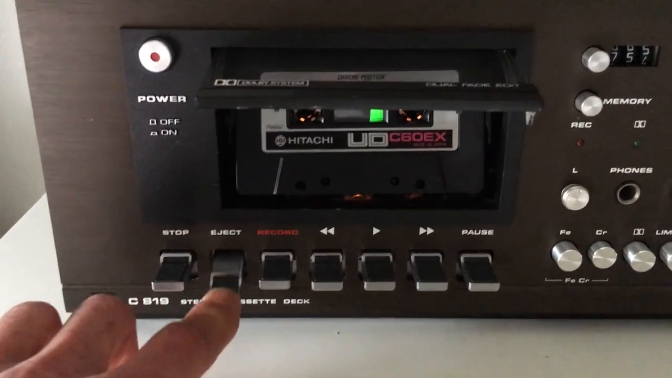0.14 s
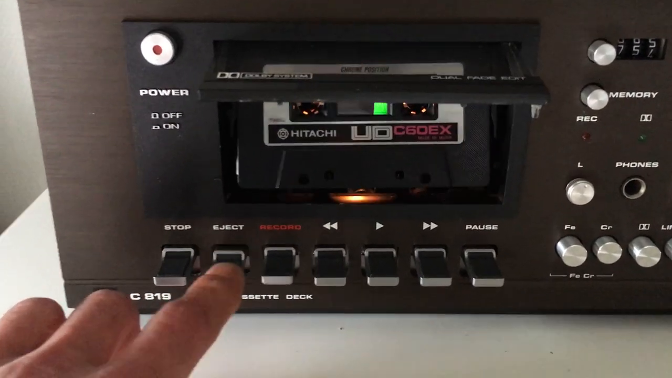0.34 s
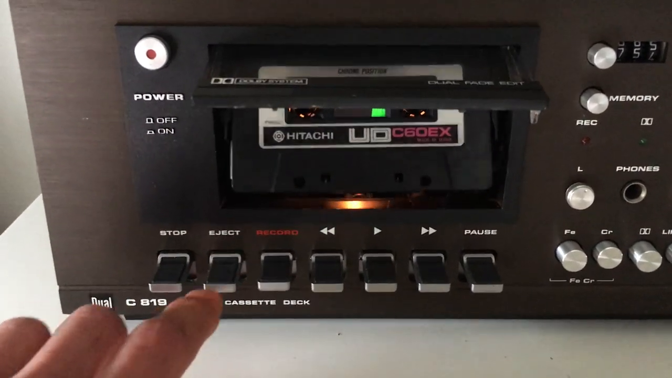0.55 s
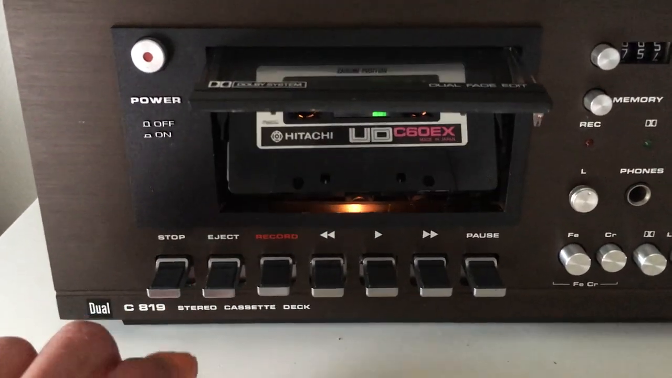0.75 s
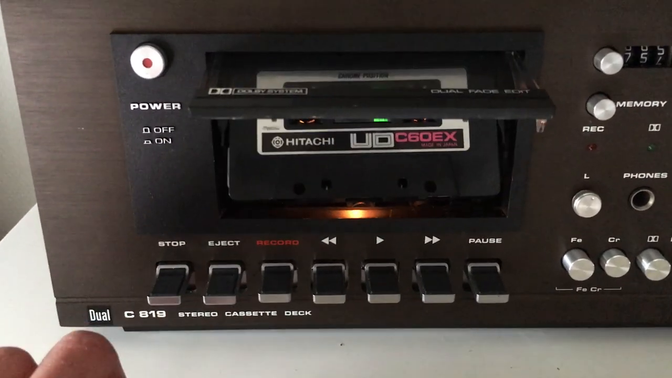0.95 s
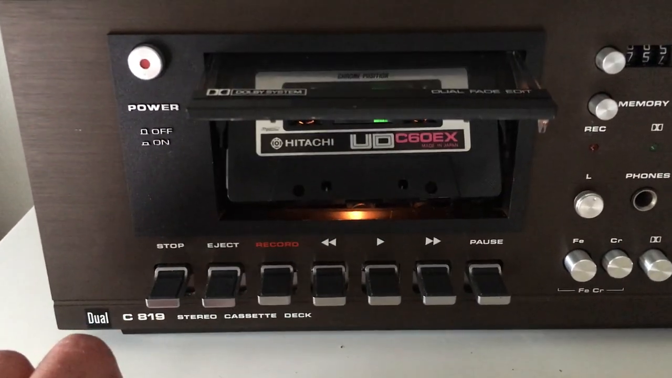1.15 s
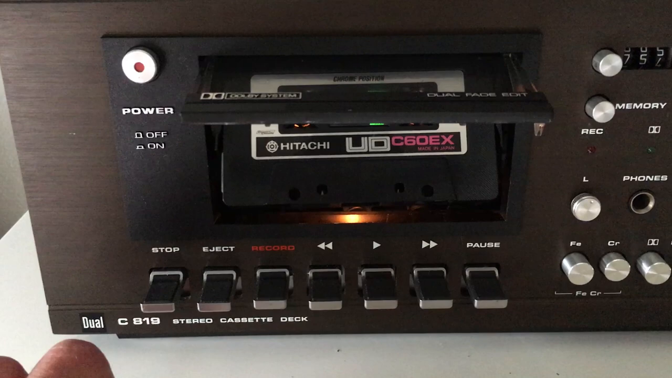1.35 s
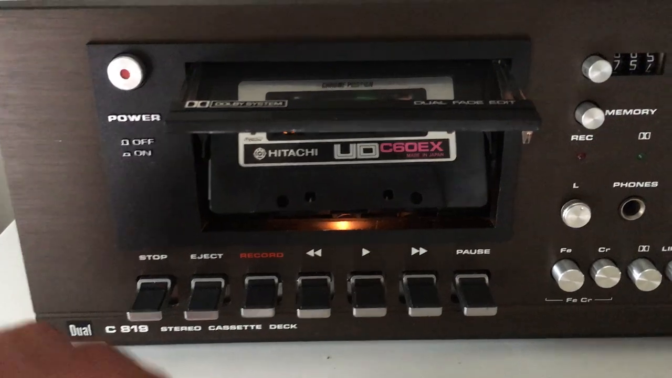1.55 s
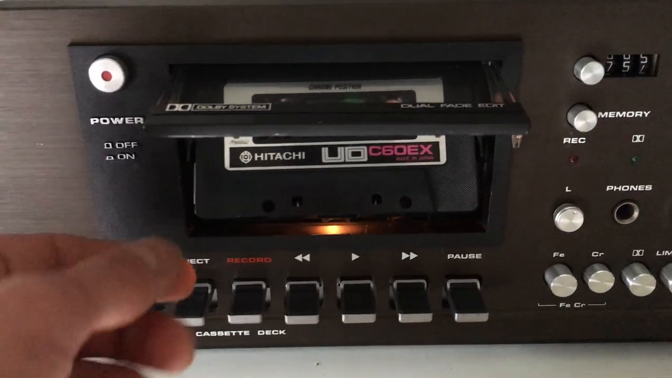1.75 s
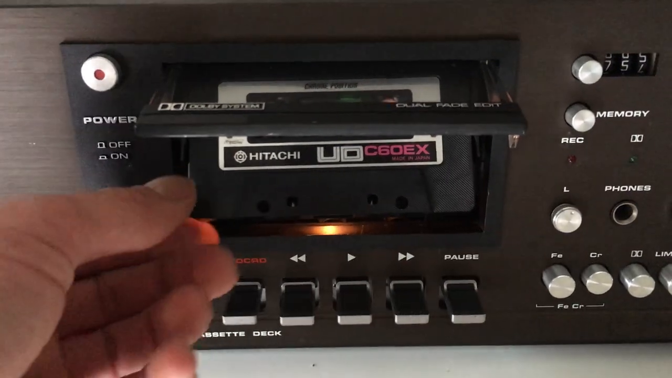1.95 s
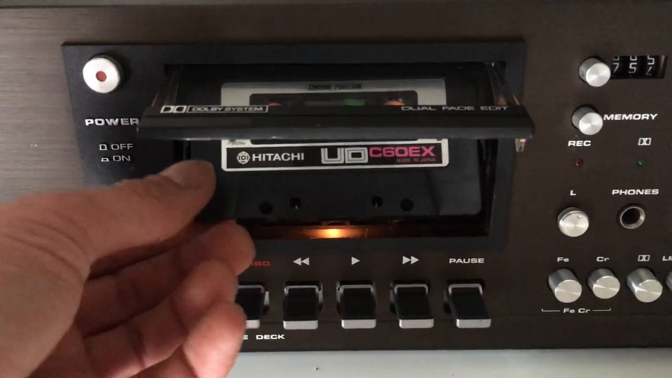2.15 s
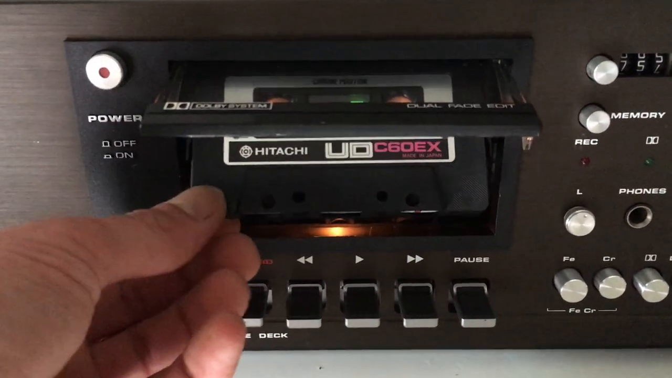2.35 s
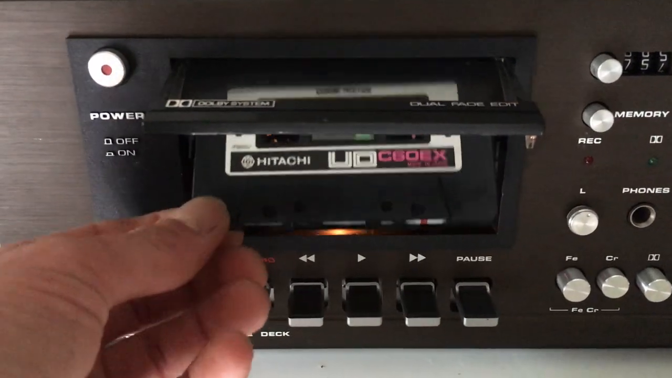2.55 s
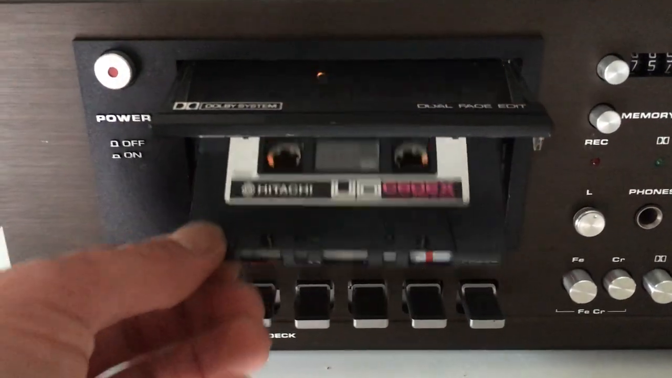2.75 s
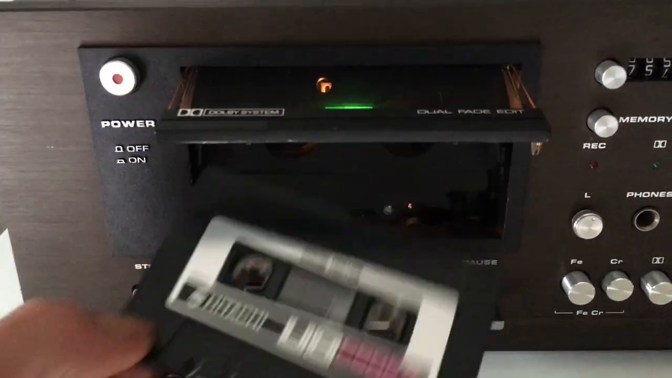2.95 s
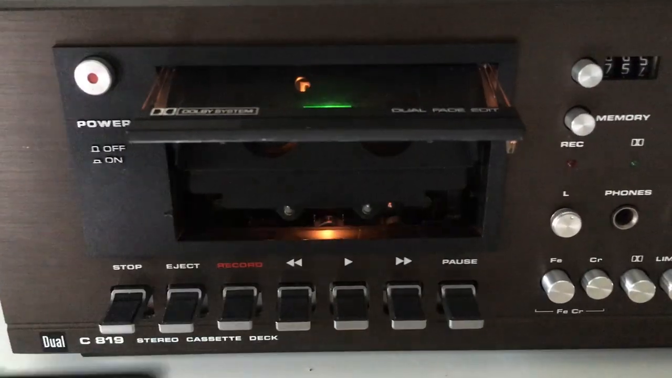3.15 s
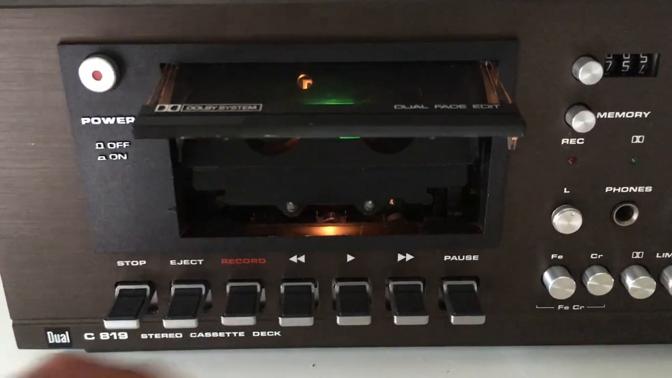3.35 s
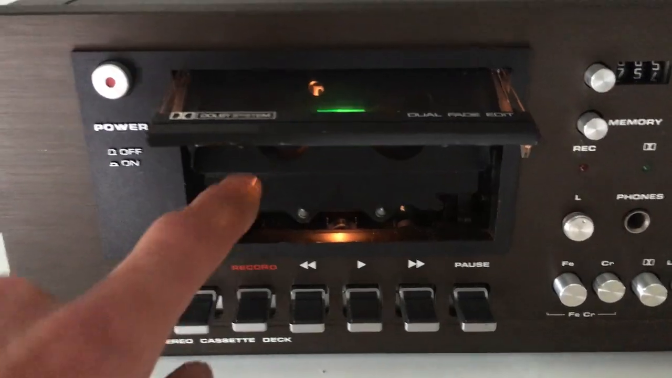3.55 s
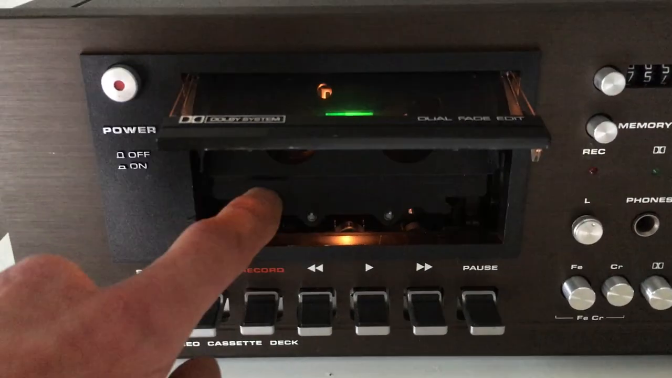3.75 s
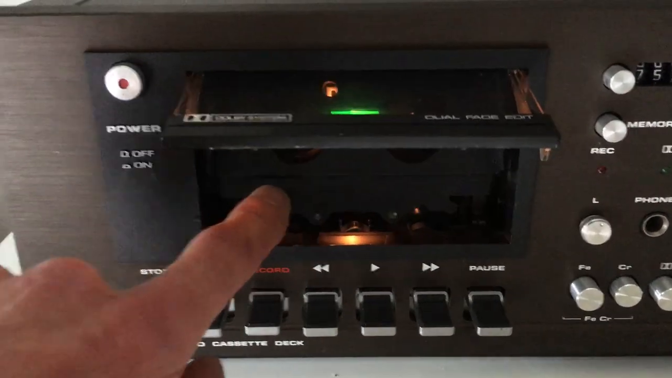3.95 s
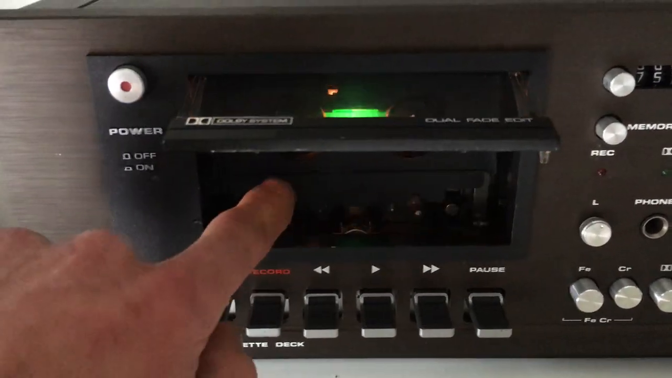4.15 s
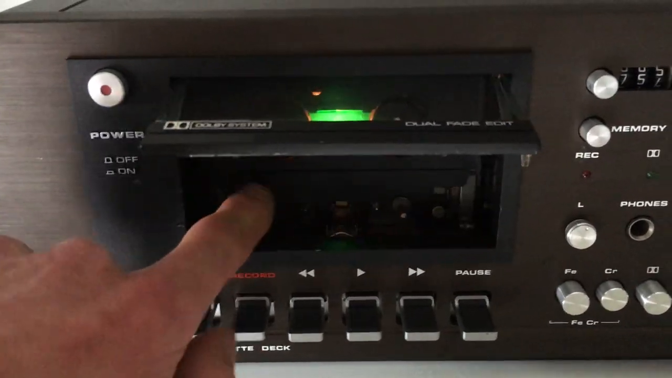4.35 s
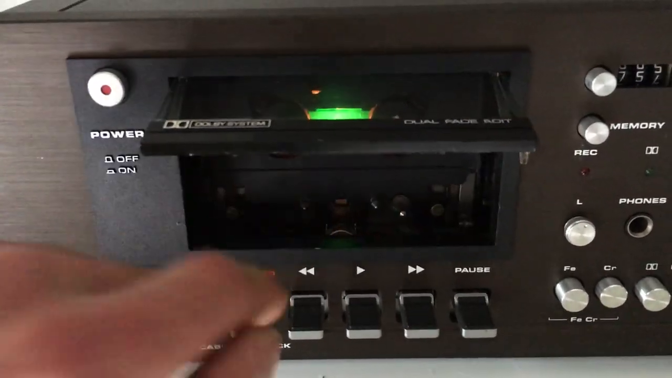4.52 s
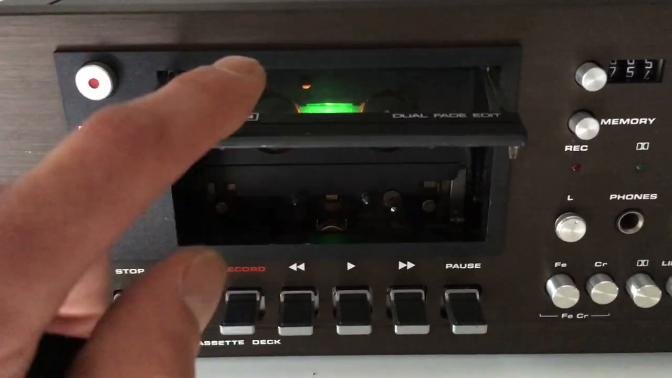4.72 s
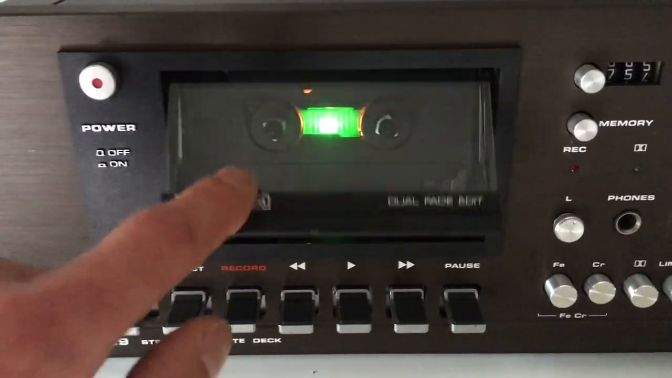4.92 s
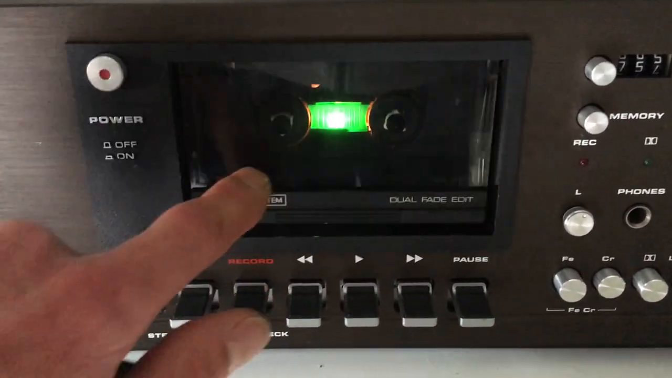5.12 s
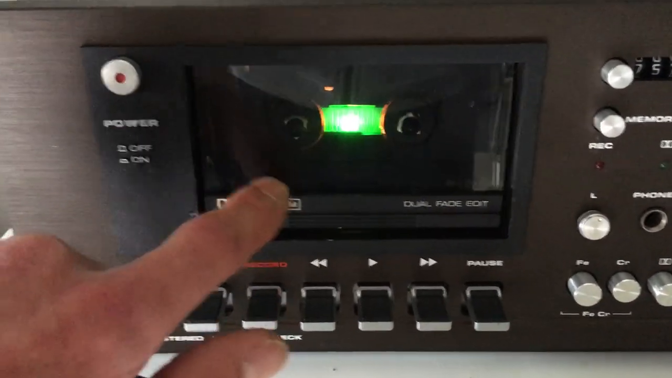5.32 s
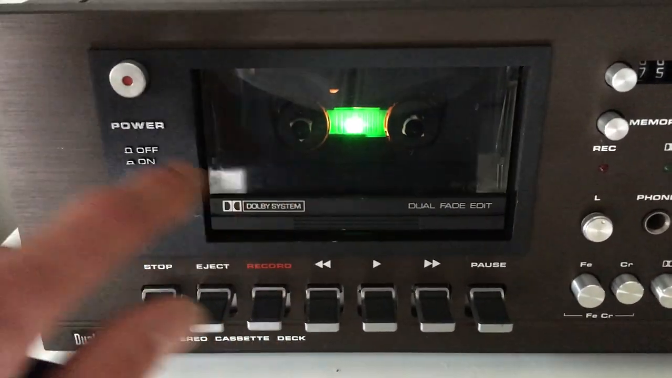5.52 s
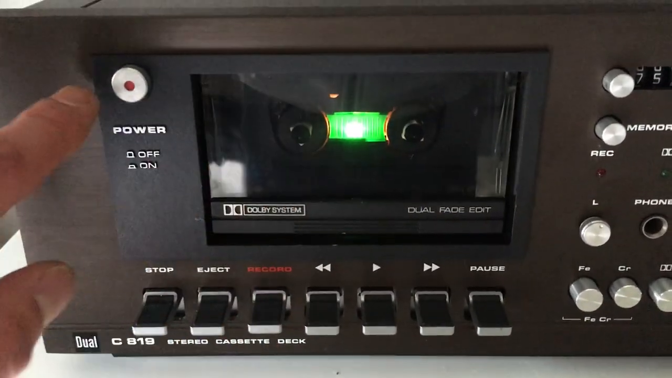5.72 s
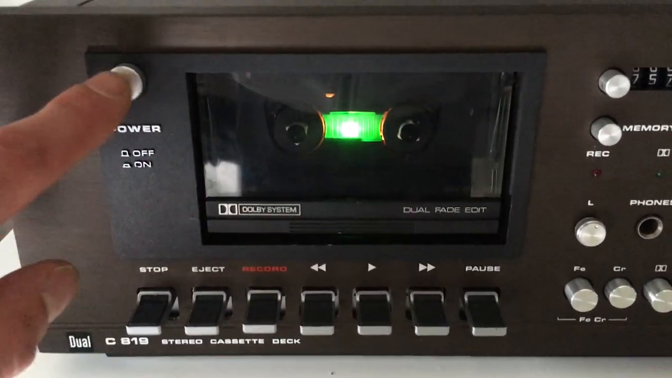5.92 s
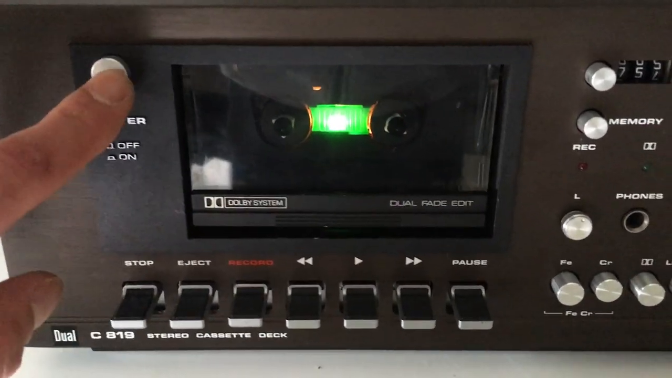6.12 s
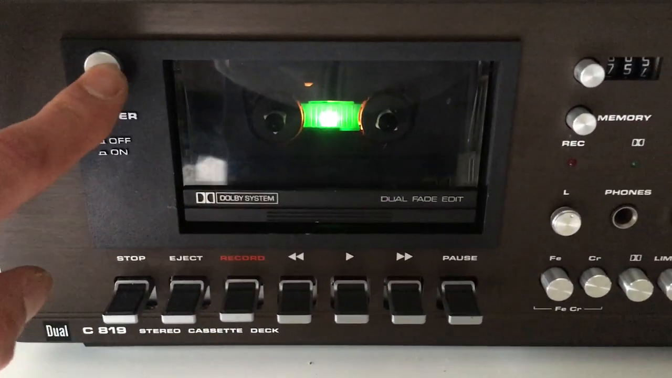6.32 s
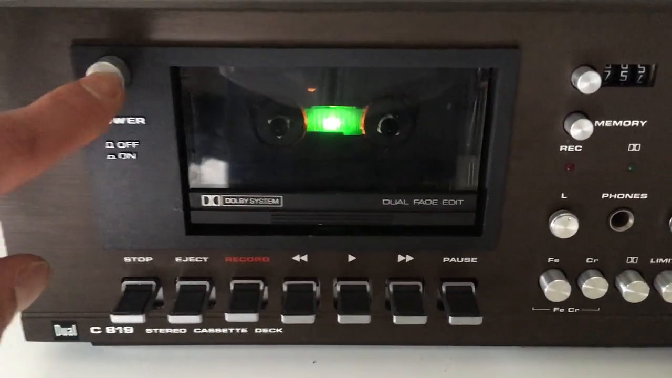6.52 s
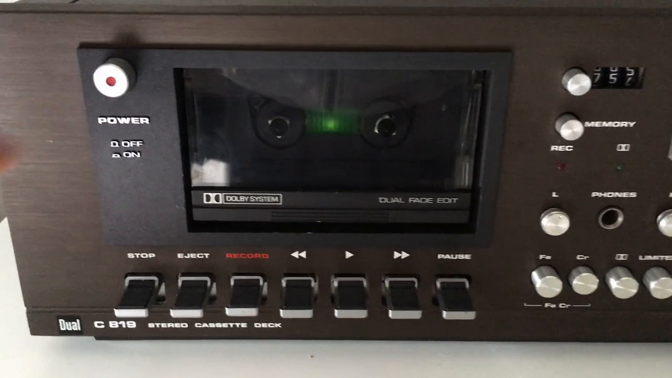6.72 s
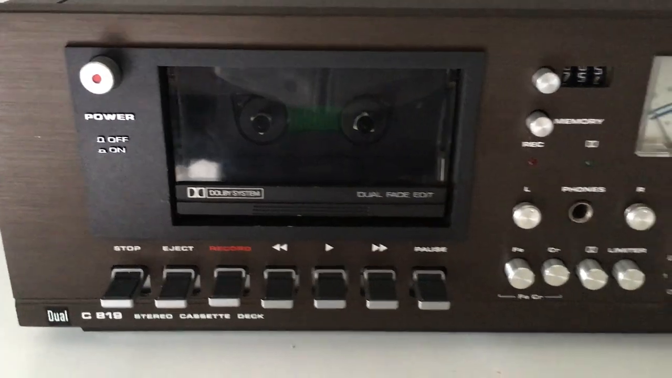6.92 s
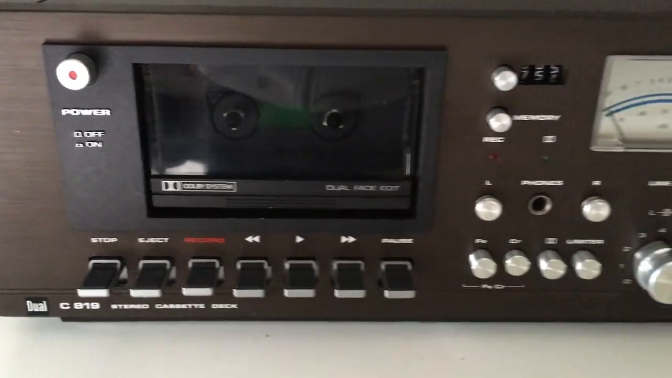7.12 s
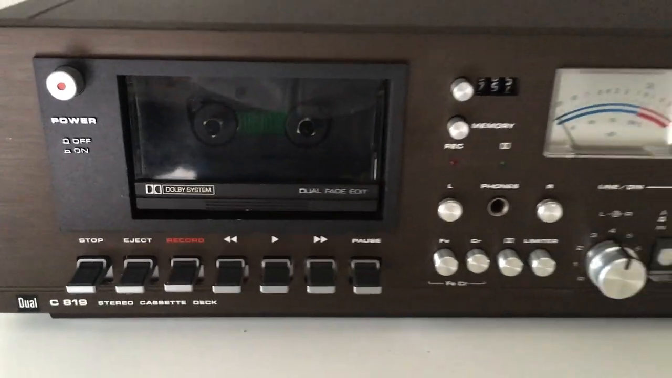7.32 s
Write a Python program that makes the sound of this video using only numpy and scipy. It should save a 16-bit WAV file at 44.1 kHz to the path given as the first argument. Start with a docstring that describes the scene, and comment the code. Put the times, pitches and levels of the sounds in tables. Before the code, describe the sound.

A cassette player's key snaps, a plastic tape rattles out, then the mechanism, door latch and power button click in a quiet room.

```python
"""A cassette deck worked by hand, close up in a small, quiet room. The eject key snaps back, the door
swings open on its whirring damper, the cassette is wiggled and slid out, a finger trips the sprung
transport, the door is latched shut and the power button is pushed in and released. Each click is a
short crack plus the ring of the struck part, and the firm blows of most parts thump the cabinet.
Sliding plastic rubs in tiny slips; low room air, hiss and a faint hum lie underneath."""
import sys
import numpy as np
from scipy import signal
from scipy.fft import rfft, irfft, next_fast_len
from scipy.io import wavfile
from scipy.ndimage import map_coordinates

SR = 44100
rng = np.random.default_rng(int(sys.argv[2]) if len(sys.argv) > 2 else 0)


def log_audio(samples):
    """Write samples as a 16-bit WAV file to the path given in sys.argv[1]."""
    # one column per channel
    frames = np.atleast_2d(samples).T
    # limit to full scale, then quantise
    limited = np.clip(frames, -1, 1)
    pcm = np.round(limited * 32767).astype(np.int16)
    wavfile.write(sys.argv[1], SR, pcm)


N = 325017
TOP_HZ = 16000
STEEL_RING_WET_DB = -19


def transport():
    """The sprung transport trips: a few light ticks, then a hard, bright volley of hits."""
    # hits: t/s, level/dB, brightness/(dB/octave)
    hits = [(3.7719, -57.5, -7), (4.005, -53, -12.5), (4.2215, -47, 1.5), (4.2405, -25, -3),
            (4.2442, -12, 0), (4.2465, -17.5, 2), (4.2488, -15.5, -1), (4.2512, -11.3, 1.8)]
    # crack colour: f/Hz, level/dB
    colour = [(30, -28), (120, -5.5), (400, -10.5), (650, -9.5), (1200, -16), (2200, -6), (2900, -11),
              (5000, -6), (9000, -2.5), (12000, -2), (16000, -6)]
    # steel modes: f/Hz, level/dB, t60/s
    modes = [(410, -29, .1), (630, -29, .07), (990, -29, .07), (1660, -28, .06), (2030, -25, .07),
             (2453, -20, .06), (3995, -16, .05), (5650, -21, .04), (6325, -20, .05), (11160, -17, .035),
             (11826, -9, .028), (14460, -13, .028)]
    snap = clicks(hits, colour, modes, crack_db=4.5, ring_db=2.5, damping=1.77, ring_growth=.14,
                  wet_db=-9, ring_wet_db=STEEL_RING_WET_DB, rebound_s=.0059, loss_db=14, duller_db=4.5)
    return snap + thumps(hits, share_db=-19, centre_hz=145, lag_s=.0011)


def eject_key():
    """The eject key ticks under the finger and snaps back."""
    # hits: t/s, level/dB, brightness/(dB/octave)
    hits = [(.1626, -55, 14), (.2434, -51.5, -6.5), (.3788, -47, 4), (.399, -47.5, -6), (.4148, -21, 5.5)]
    # crack colour: f/Hz, level/dB
    colour = [(120, -39), (200, -11.5), (1770, -10), (1980, -14), (2290, -2), (2700, -14), (2960, -4.5),
              (4860, -13), (5630, -7), (12400, -9.5), (16000, -12)]
    # steel modes: f/Hz, level/dB, t60/s
    modes = [(1460, -22, 0.046), (1748, -17.5, .04), (2220, -10, 0.022), (2960, -10, 0.032),
             (4340, -16, 0.045), (5670, -13, .03), (6740, -8, .015), (9300, -11, 0.013), (12170, -8, 0.016)]
    snap = clicks(hits, colour, modes, crack_db=2, ring_db=8.5, damping=1.02, ring_growth=.35,
                  wet_db=-10, ring_wet_db=STEEL_RING_WET_DB, rebound_s=.0035, loss_db=7, duller_db=7)
    return snap + thumps(hits, share_db=-21.5, centre_hz=215, lag_s=.004)


def door():
    """The door comes free with a clatter of rebounding hits."""
    # hits: t/s, level/dB, brightness/(dB/octave)
    hits = [(.6195, -37.5, 0), (.6408, -33, 5), (.6478, -24, -1.5), (.6508, -28, -2), (.6568, -19.5, 1),
            (.819, -59, 1)]
    # crack colour: f/Hz, level/dB
    colour = [(120, -48), (200, -29), (448, -15), (635, -9), (1300, -11.5), (1500, -12), (1680, 0),
              (2470, -11), (4680, -11), (5700, -9.5), (10500, -15), (11500, -13.5), (16000, -19)]
    # door modes: f/Hz, level/dB, t60/s
    modes = [(630, -15, 0.077), (1310, -5, 0.033), (1647, -1.5, 0.051), (1810, -14, 0.043),
             (2030, -6.5, 0.068), (3010, -15, 0.043)]
    clatter = clicks(hits, colour, modes, crack_db=.5, ring_db=-7, damping=1.47, ring_growth=.4,
                     wet_db=-14, ring_wet_db=-12.5, rebounds=3, rebound_s=.0113, loss_db=11,
                     duller_db=1.6)
    return clatter + thumps(hits, share_db=-16.5, centre_hz=183, lag_s=.014)


def latch():
    """The door is pushed shut and its latch catches with a clack."""
    # hits: t/s, level/dB, brightness/(dB/octave)
    hits = [(4.8513, -51, -3.5), (4.857, -49.5, 0.7), (5.1238, -34.5, 3), (5.156, -43, 1),
            (5.162, -21.5, 2.5), (5.3538, -55, -2.5)]
    # crack colour: f/Hz, level/dB
    colour = [(150, -35), (250, -10.5), (1280, -10.5), (1450, -4.5), (1670, -5.5), (2050, -8.5),
              (2400, -4.5), (2910, -10), (3710, -11), (10900, -13.5), (16000, -8)]
    # latch modes: f/Hz, level/dB, t60/s
    modes = [(648, -19, 0.2), (1301, -16, 0.12), (1660, -13.5, 0.066), (2230, -25, 0.041), (2354, 0, 0.02),
             (3620, -19.5, 0.037)]
    clack = clicks(hits, colour, modes, crack_db=.5, ring_db=.3, damping=.91, ring_growth=.08,
                   wet_db=-12, ring_wet_db=-20, rebound_s=.0025, loss_db=11, duller_db=4)
    return clack + thumps(hits, share_db=-24.5, centre_hz=132, lag_s=.003)


def power_button():
    """The power button clicks in, slides back out and clicks again."""
    # hits: t/s, level/dB, brightness/(dB/octave)
    hits = [(6.2473, -24, 3), (6.4508, -57, -6.5), (6.5553, -32, -1)]
    # crack colour: f/Hz, level/dB
    colour = [(150, -22), (500, -13), (1000, -11), (1500, -10), (2600, -4), (3600, -10), (4600, -19.5),
              (6200, -1.5), (7800, -9.5), (13500, 3.5), (16000, -6.5)]
    # button modes: f/Hz, level/dB, t60/s
    modes = [(2290, -22, .06), (2573, -16, 0.055), (2650, -25, 0.076), (6030, -18, 0.052),
             (9480, -15, 0.043), (13800, -9, 0.022)]
    # return stroke: t/s, length/s, level/dB
    stroke = [(6.5, 0.056, -55.5)]
    # scrape colour: f/Hz, level/dB
    scrape_colour = [(600, 1), (1600, -2), (4500, -0.5), (8000, -6), (15000, -8)]
    click = clicks(hits, colour, modes, crack_db=0, ring_db=-.3, damping=.57, ring_growth=.82,
                   wet_db=-11, ring_wet_db=-5.5, rebound_s=.0042, loss_db=11, duller_db=4.5)
    return click + rubbing(stroke, scrape_colour, swell=.86, release_s=.045, slips_per_s=1200,
                           smooth=.73, wet_db=-2)


def cassette():
    """The wiggled cassette clacks, and its loose reels knock inside the hollow shell."""
    # shell hits: t/s, level/dB, brightness/(dB/octave)
    hits = [(2.463, -45, -6), (2.472, -34.5, 1.5), (2.4785, -36, 1.5), (2.5485, -30, 3), (2.571, -42, -6),
            (2.687, -42, -4), (3.2953, -48.5, 11), (3.4337, -54, -2), (3.443, -54, 4)]
    # reel knocks: t/s, level/dB, brightness/(dB/octave)
    knocks = [(2.0902, -58, 0.5), (2.2042, -43, -3), (3.18, -61, 2), (3.345, -54.5, -2.5)]
    # crack colour: f/Hz, level/dB
    colour = [(150, -9), (250, -9), (3120, -6.5), (3770, -12), (4410, -4.5), (5070, -7.5), (9010, -3.5),
              (10200, -11), (11700, -3), (16000, -15)]
    # shell modes: f/Hz, level/dB, t60/s
    modes = [(667, -19.5, 0.027), (1440, -11, 0.023), (1926, -10.5, 0.022), (2190, -8, 0.017),
             (2760, -11.5, 0.014)]
    shell = clicks(hits, colour, modes, crack_db=2.5, ring_db=-4, damping=1.03, ring_growth=.11,
                   wet_db=-13.5, ring_wet_db=-11, rebound_s=.0061, loss_db=5.5, duller_db=3)
    reels = clicks(knocks, colour, modes, crack_db=1.5, ring_db=11, damping=1.13, ring_growth=.23,
                   wet_db=-13, ring_wet_db=-12.5, rebounds=0)
    return shell + reels + thumps(hits, share_db=-16.5, centre_hz=145, lag_s=.003)


def panel():
    """Dull knocks on the panel carry strongly into the cabinet."""
    # hits: t/s, level/dB, brightness/(dB/octave)
    hits = [(4.005, -63, -6), (4.857, -61.5, -3), (5.355, -59, -12), (6.188, -61, 3), (6.251, -43.5, -2),
            (6.4967, -56.5, 3), (6.5695, -33.5, -1)]
    # knock colour: f/Hz, level/dB
    colour = [(150, -16.5), (400, -34), (650, -2), (800, -5), (1000, -0.5), (1250, -13.5), (1900, -11.5),
              (3500, -36.5), (12000, -47)]
    # panel modes: f/Hz, level/dB, t60/s
    modes = [(660, -13, 0.098), (970, 0, 0.06)]
    knocks = clicks(hits, colour, modes, crack_db=-2, ring_db=1.5, damping=.75, ring_growth=.03,
                    wet_db=-8.5, ring_wet_db=-16.5, rebounds=2, rebound_s=.0041, loss_db=7.5,
                    duller_db=.3)
    return knocks + thumps(hits, share_db=-3, centre_hz=245, lag_s=.0081)


def door_stop():
    """The opening door meets its end stop with one tight tick."""
    # hit: t/s, level/dB, brightness/(dB/octave)
    hits = [(1.6297, -42, 0)]
    # crack colour: f/Hz, level/dB
    colour = [(400, -28), (1400, -12), (3000, -1), (5000, -5), (8500, -6.5), (12000, 0), (16000, -4)]
    # stop modes: f/Hz, level/dB, t60/s
    modes = [(1990, -20, 0.036), (3090, -16, 0.027)]
    return clicks(hits, colour, modes, crack_db=6, ring_db=1.5, damping=3.3, ring_growth=0,
                  wet_db=-11.5, ring_wet_db=-13, rebounds=0)


def cassette_slide():
    """Plastic scrapes out of the holder."""
    # pulls: t/s, length/s, level/dB
    pulls = [(2.47, .16, -59.5), (2.67, 0.05, -58), (2.756, 0.13, -44.5)]
    # scrape colour: f/Hz, level/dB
    colour = [(200, -32), (400, -17.5), (630, 2.5), (750, -2.5), (1250, -10), (1440, 8), (1750, -8),
              (2450, -5.5), (3000, -19.5), (3700, -16), (4300, -10.5), (5000, -17), (15500, -23)]
    return rubbing(pulls, colour, swell=.73, release_s=.065, slips_per_s=1100, smooth=.97,
                   wet_db=-13, catch_db=1.5)


def hand():
    """The hand presses on the cabinet and shifts the cassette in its fingers."""
    # presses: t/s, level/dB, centre f/Hz
    presses = [(1.6, -56, 150), (2.519, -41, 119), (2.687, -51, 200), (2.828, -50.5, 211),
               (4.868, -46.5, 152), (6.109, -49, 207), (6.196, -46, 234)]
    # finger rubs: t/s, length/s, level/dB
    rubs = [(3.17, 0.035, -56.5), (3.245, 0.05, -59.5), (3.335, 0.084, -64.5)]
    # rub colour: f/Hz, level/dB
    colour = [(500, -11), (1000, -7), (1350, 7.5), (1700, -2), (2050, -4), (2800, -9.5), (4800, -11),
              (8000, -5), (11000, -5.5), (15500, -9.5)]
    grip = rubbing(rubs, colour, swell=.32, release_s=.08, slips_per_s=400, smooth=.7, wet_db=-9)
    return cabinet(presses) + grip


def damper():
    """The damper whirrs as the door creeps open."""
    # glide: t/s, length/s, level/dB
    glide = [(.93, 0.195, -74.5)]
    # whirr colour: f/Hz, level/dB
    colour = [(600, -18), (1200, -12), (1540, 3), (1850, -5.5), (2120, -5.5), (2700, -16), (6000, -28)]
    return rubbing(glide, colour, swell=.58, release_s=2.6, slips_per_s=1500, smooth=.97,
                   wet_db=-13, catch_db=2)


def clicks(hits, colour, modes, crack_db, ring_db, damping, ring_growth, wet_db, ring_wet_db,
           rebounds=1, rebound_s=0, loss_db=0, duller_db=0):
    """Hard hits on one part: a dense crack plus its modes, treble first. Harder blows ring more
    (ring_growth, dB per dB); rebounds come back weaker and duller."""
    # decay of small parts before damping: f/Hz, t60/s
    part_decay = [(200, .09), (1000, 0.056), (3000, 0.041), (8000, 0.024), (15000, 0.022)]
    decay = [(hz, t60 / damping) for hz, t60 in part_decay]
    track, grid = np.zeros(N), np.linspace(0, TOP_HZ, 1024)
    rise = lambda hz: 1.2 / hz  # attack of 1.2 cycles
    body = lambda hz: amp(along(colour, hz))
    hardest_db = max(db for _, db, _ in hits)
    for s, blow_db, brightness in hits:
        crack, tone = np.zeros((2, SR // 4))
        for k in range(rebounds + 1):
            db = blow_db - loss_db * np.sqrt(k)
            tilt = brightness - duller_db * np.sqrt(k)
            hardness = lambda hz: amp(tilt * np.log2(np.maximum(hz, 800) / 800))
            tilted_rms = rms(hardness(grid) * body(grid))
            makeup = rms(body(grid)) / tilted_rms  # hardness changes colour, not level
            burst = dying_noise(lambda hz: hardness(hz) * body(hz) / tilted_rms, decay, rise)
            add(crack, k * rebound_s, amp(db + crack_db) * burst)
            ring_gain = makeup * amp(db + ring_db + ring_growth * (db - hardest_db))
            add(tone, k * rebound_s, ring_gain * ring(modes, hardness, rise))
        add(track, s, crack + tone)
        add(track, s, room(amp(wet_db) * crack + amp(ring_wet_db) * tone))
    return track


def thumps(hits, share_db, centre_hz, lag_s, firm_range_db=11, burst_s=.03):
    """A part's firm blows pass a share of their force to the cabinet; a quick burst is one push."""
    hardest_db = max(db for _, db, _ in hits)
    firm = [(s, db) for s, db, _ in hits if db > hardest_db - firm_range_db]
    leading = [(s, db) for s, db in firm if not any(0 < s - earlier < burst_s for earlier, _ in firm)]
    return cabinet([(s + lag_s, db + share_db, centre_hz) for s, db in leading])


def cabinet(pushes, width_octaves=.62):
    """Each push wakes the cabinet modes near its own frequency, and a blur of panel rumble."""
    # cabinet modes: f/Hz, level/dB, t60/s
    modes = [(92.04, -4.5, 0.41), (130.8, -0.5, 0.43), (142, -5, .25), (172.9, -3, 0.22), (213.4, -2, 0.27),
             (260, -10, 0.16), (311.2, -4.5, 0.11)]
    track = np.zeros(N)
    rise = lambda hz: .65 / hz
    for s, db, centre_hz in pushes:
        reach = lambda hz: np.exp(-.5 * (np.log2((hz + 1) / centre_hz) / width_octaves) ** 2)
        rumble = dying_noise(lambda hz: unit(reach(hz)), [(100, .38), (500, .072)], rise, size=16384)
        boom = ring(modes, reach, rise, size=16384)
        add(track, s, amp(db - 4.5) * in_room(boom + amp(-6) * rumble, wet_db=-6))
    return track


def rubbing(strokes, colour, swell, release_s, slips_per_s, smooth, wet_db, catch_db=2.5):
    """Friction: tiny slips and smooth hiss sound through the plastic as it catches and lets go."""
    t = np.arange(N) / SR
    level = np.zeros(N)
    for s, length, db in strokes:
        speed = np.clip((t - s) / length, 0, 1) ** swell
        level += speed * amp(db - 60 * np.maximum(t - s - length, 0) / release_s)
    slips = (rng.random(N) < slips_per_s / SR) * rng.standard_normal(N)
    hiss = rng.standard_normal(N)
    catching = map_coordinates(rng.standard_normal(4096), [t * 110], order=1)  # 110 catches a second
    drive = (unit(slips) + smooth * hiss) * amp(catch_db * catching)
    scrape = unit(filtered(drive, lambda hz: amp(along(colour, hz))))
    return in_room(level * scrape, wet_db)[:N]


def ring(modes, gain, rise, size=8192, scatter_db=1.7):
    """Damped modes, set swinging from rest at slightly new strengths each time."""
    t = np.arange(size) / SR
    hz, db, t60 = np.transpose(modes)[:, :, None]
    strength = gain(hz) * amp(db + scatter_db * rng.standard_normal(hz.shape))
    return np.sum(strength * np.sin(2 * np.pi * hz * t) * envelope(t, rise(hz), t60), axis=0)


def dying_noise(gain, decay, rise, size=6144):
    """Coloured noise in which every band swells and dies at its own speed."""
    t, hz = np.arange(size) / SR, np.fft.rfftfreq(size, 1 / SR)
    centres = np.geomspace(120, 15000, 8)
    shares = np.array([np.interp(np.log(hz + 1), np.log(centres), row) for row in np.eye(len(centres))])
    bands = irfft(rfft(rng.standard_normal(size)) * gain(hz) * shares)
    return np.sum(bands * envelope(t, rise(centres)[:, None], along(decay, centres)[:, None]), axis=0)


def envelope(t, rise_s, t60):
    """Exponential attack and decay."""
    return (1 - np.exp(-t / rise_s)) * amp(-60 * t / t60)


def amp(db):
    """Decibels to gain."""
    return 10 ** (np.asarray(db) / 20)


def rms(x):
    """Root mean square, never zero."""
    return np.sqrt(np.mean(x ** 2) + 1e-20)


def unit(x):
    """Scale to rms 1."""
    return x / rms(x)


def along(points, hz):
    """Read (f/Hz, value) points on a log axis."""
    f, v = np.transpose(points)
    return np.interp(np.log(hz + 1), np.log(f + 1), v)


def filtered(x, response):
    """Equalise x with a gain curve over frequency."""
    m = next_fast_len(len(x) + SR // 8)
    return irfft(rfft(x, m) * response(np.fft.rfftfreq(m, 1 / SR)), m)[:len(x)]


def add(track, s, sound):
    """Mix a sound into the track at time s."""
    start = round(s * SR)
    track[start:start + len(sound)] += sound[:len(track) - start]


def in_room(x, wet_db):
    """A sound together with its reverb."""
    out = amp(wet_db) * room(x)
    out[:len(x)] += x
    return out


def room(x, build_s=.0037):
    """The diffuse answer of the walls: a slightly warm tail of unit energy."""
    # reverb time: f/Hz, t60/s
    decay = [(120, .6), (500, 0.46), (2000, .5), (6000, 0.49), (10000, 0.24), (15000, 0.2)]
    colour = [(150, 3), (800, .5), (2000, .36), (7000, -.5), (15000, -1)]  # f/Hz, level/dB
    tail = dying_noise(lambda hz: amp(along(colour, hz)), decay, lambda hz: build_s + 0 * hz, size=24576)
    return signal.fftconvolve(x, tail / np.linalg.norm(tail))


def background(air_db=-63, low_cut_hz=33):
    """Room tone: low air, hiss and a faint hum."""
    # colour of air and hiss: f/Hz, level/dB
    colour = [(15, -41.5), (25, -13.5), (58, -1), (99, -5), (123, -12), (241, -11.5), (276, -17.5),
              (316, -12.5), (371, -24), (403, -20.5), (437, -24), (691, -25.5), (4950, -39), (13800, -34.5),
              (15800, -36.5)]
    # hum tones: f/Hz, level/dB
    tones = [(49, -69), (100, -74), (317, -85.5)]
    t = np.arange(N) / SR
    low_cut = lambda hz: hz ** 4 / (hz ** 4 + low_cut_hz ** 4)
    air = unit(filtered(rng.standard_normal(N), lambda hz: amp(along(colour, hz)) * low_cut(hz)))
    hum = sum(amp(db) * np.sqrt(2) * np.sin(2 * np.pi * (hz * t + rng.random())) for hz, db in tones)
    return amp(air_db) * air + hum


def scene():
    """All parts of the deck over the room tone, in mono."""
    mechanism = transport() + eject_key() + door() + latch() + power_button() + door_stop() + damper()
    handling = cassette() + cassette_slide() + panel() + hand()
    return (mechanism + handling + background())[None]


def record(dry):
    """A steep high cut at TOP_HZ."""
    return filtered(dry[0], lambda hz: 1 / np.sqrt(1 + (hz / TOP_HZ) ** 200))[None]


dry = scene()
out = record(dry)
log_audio(out)
```